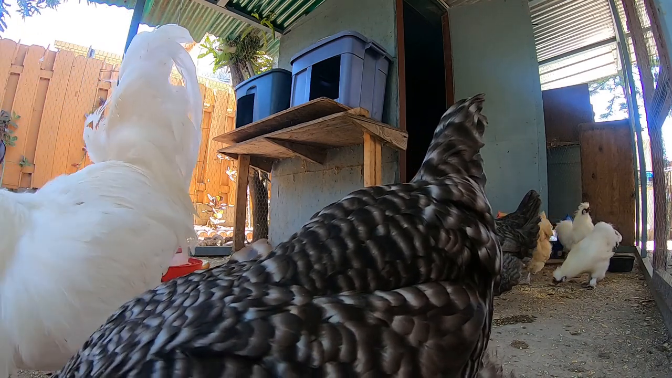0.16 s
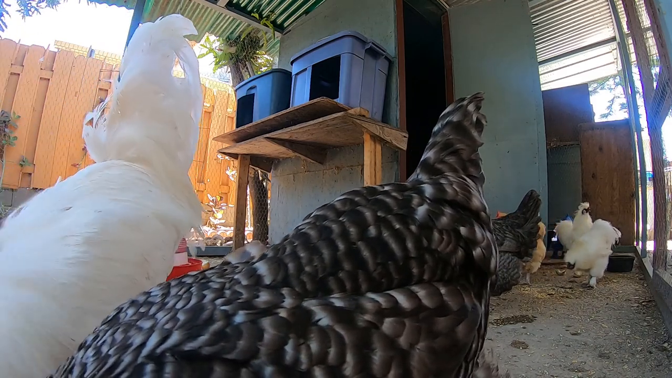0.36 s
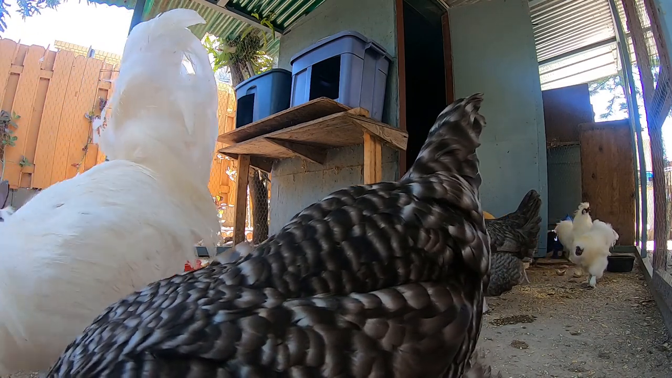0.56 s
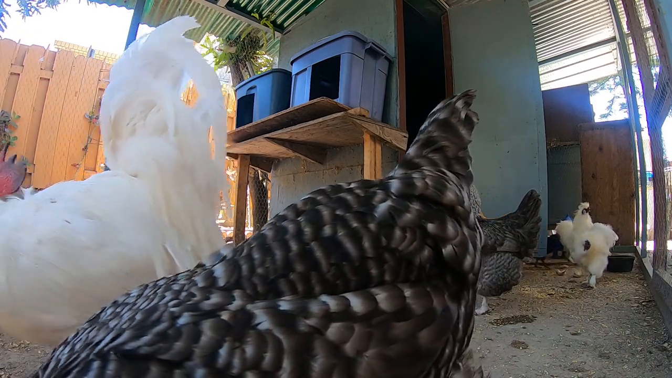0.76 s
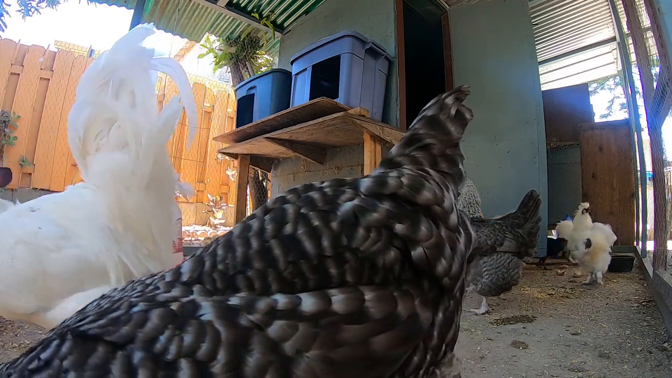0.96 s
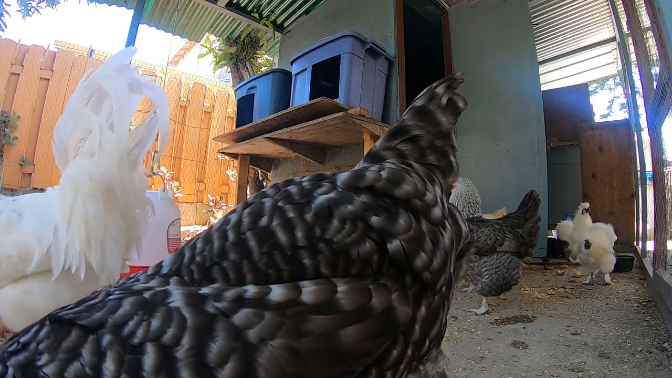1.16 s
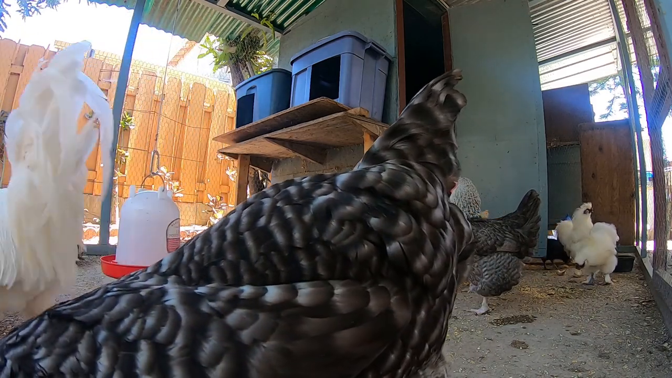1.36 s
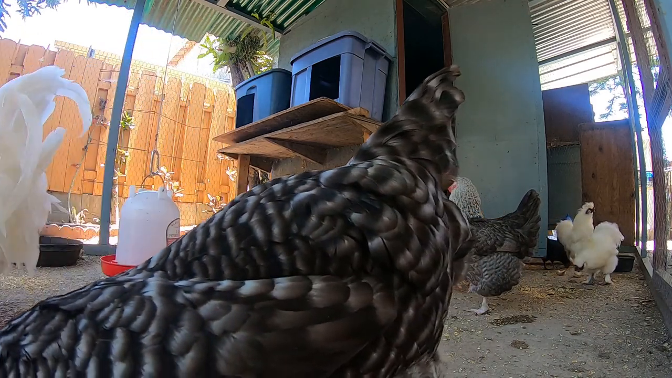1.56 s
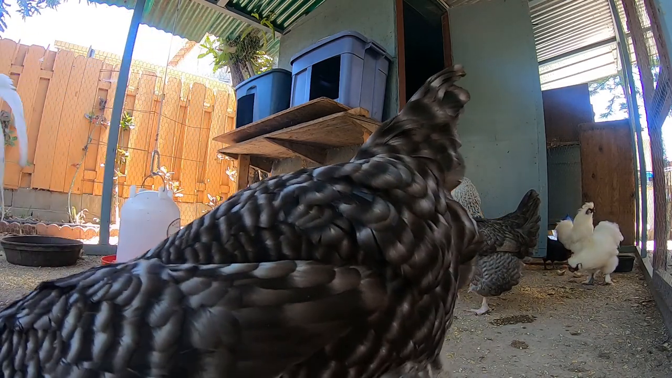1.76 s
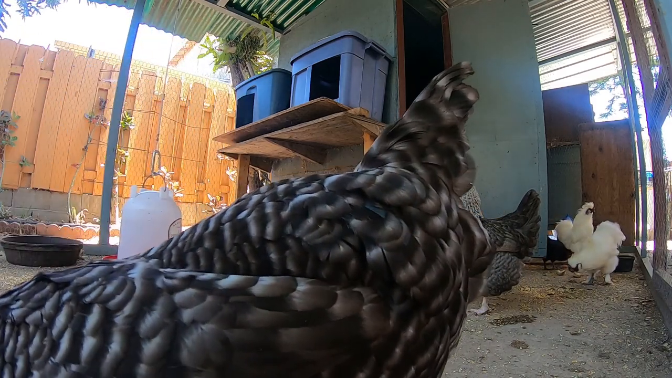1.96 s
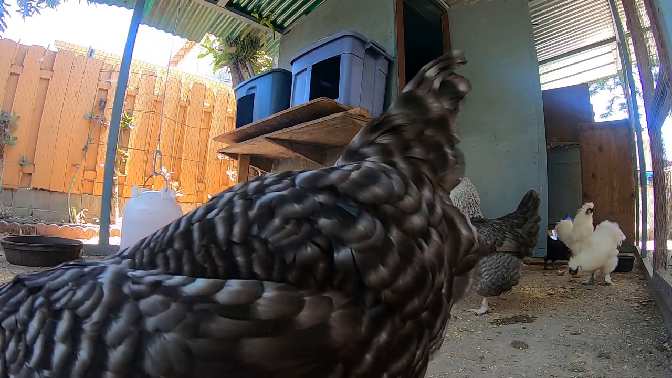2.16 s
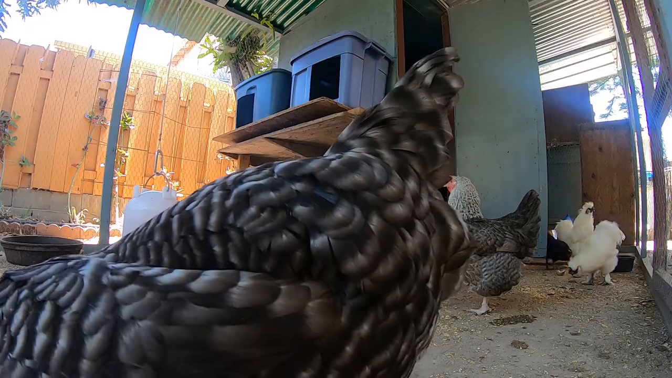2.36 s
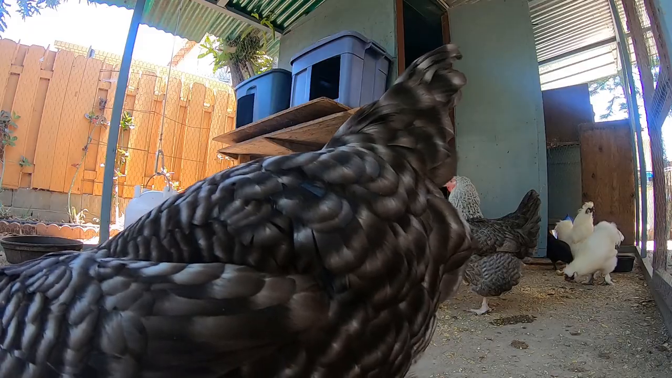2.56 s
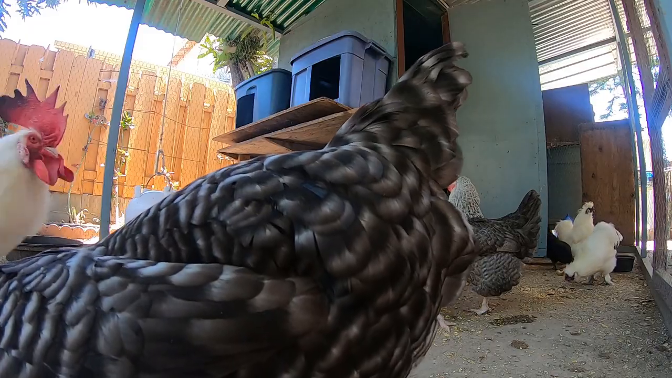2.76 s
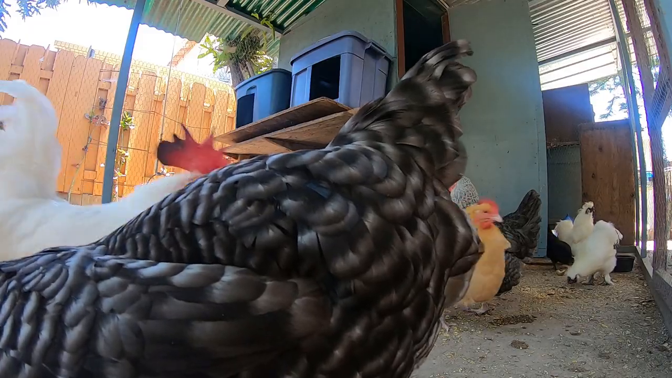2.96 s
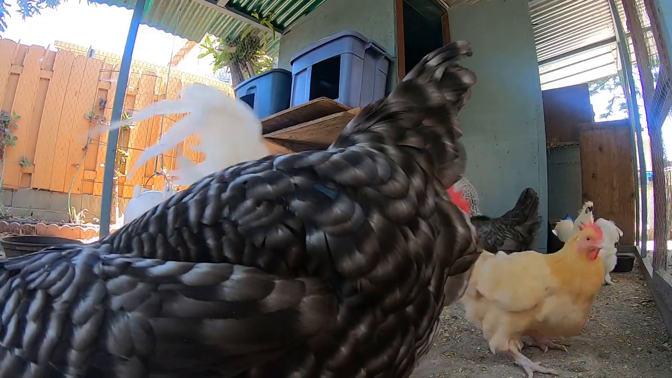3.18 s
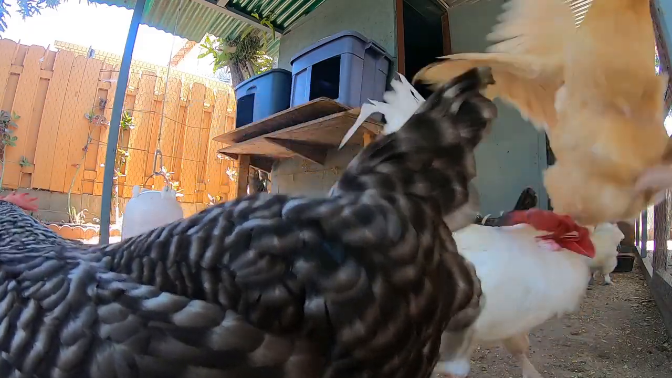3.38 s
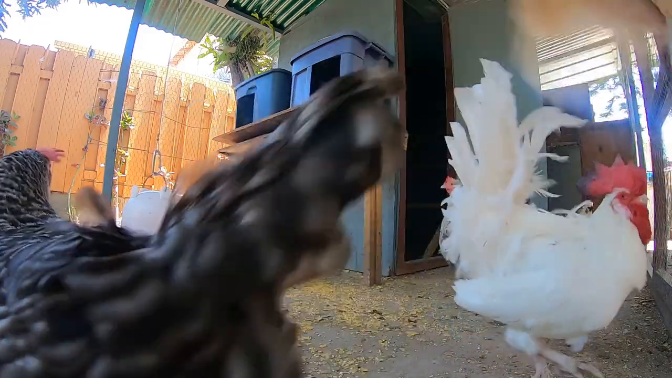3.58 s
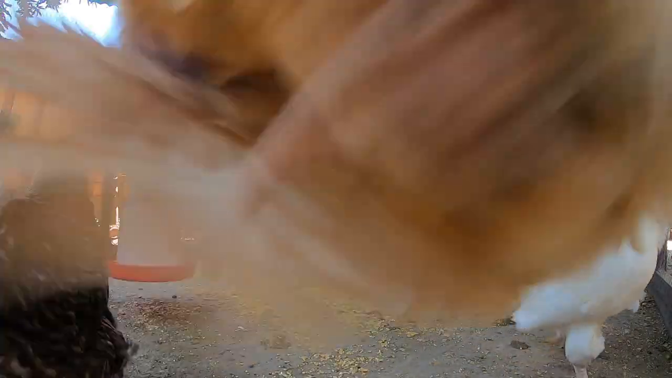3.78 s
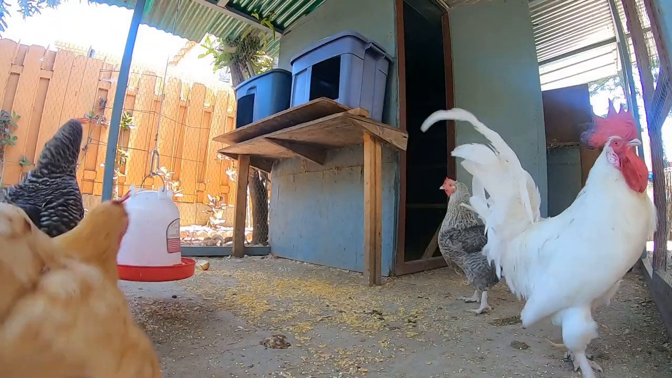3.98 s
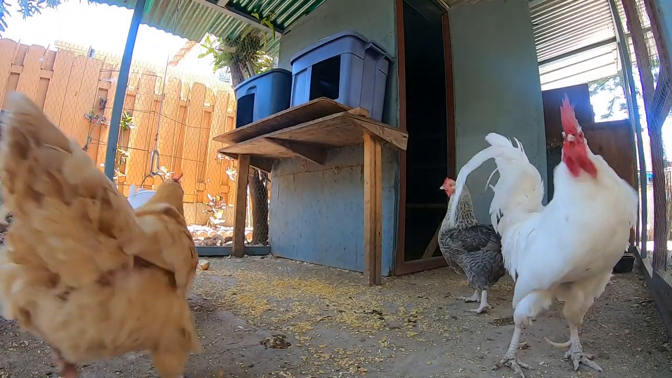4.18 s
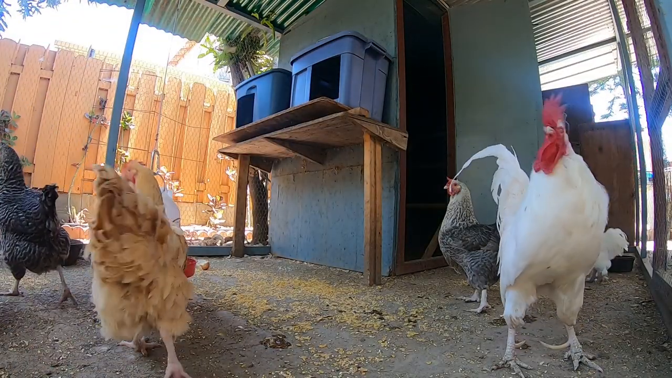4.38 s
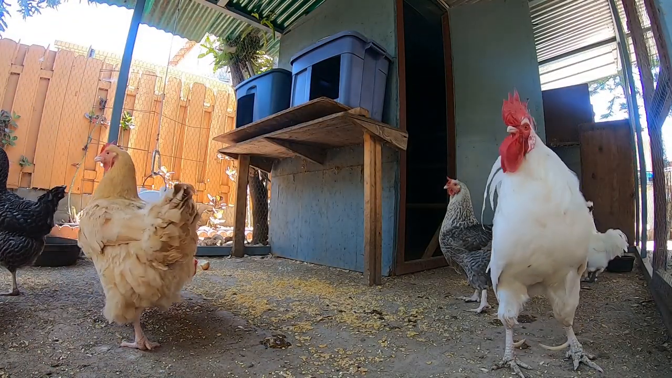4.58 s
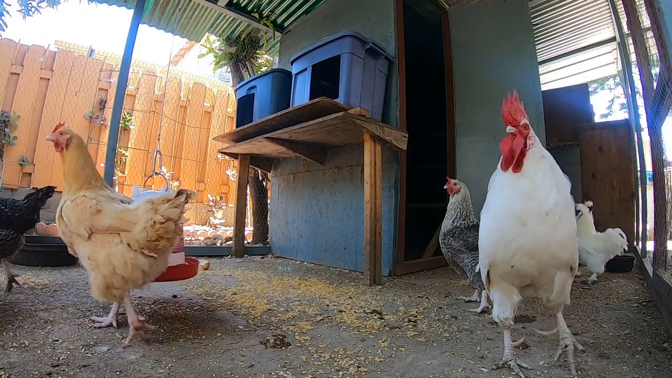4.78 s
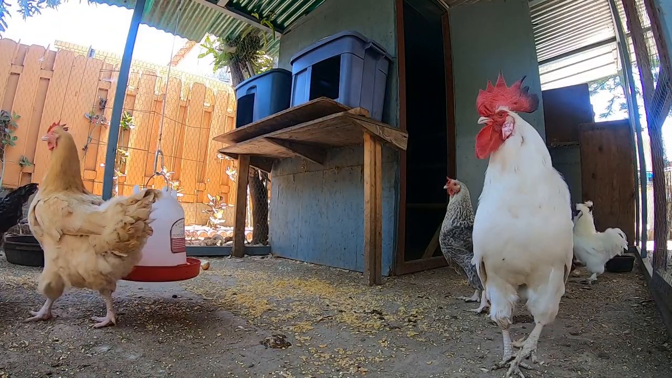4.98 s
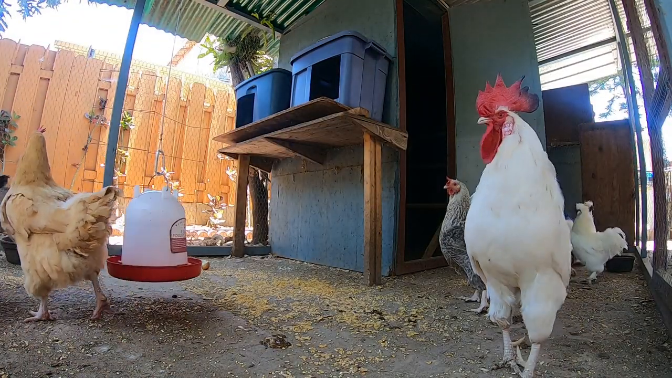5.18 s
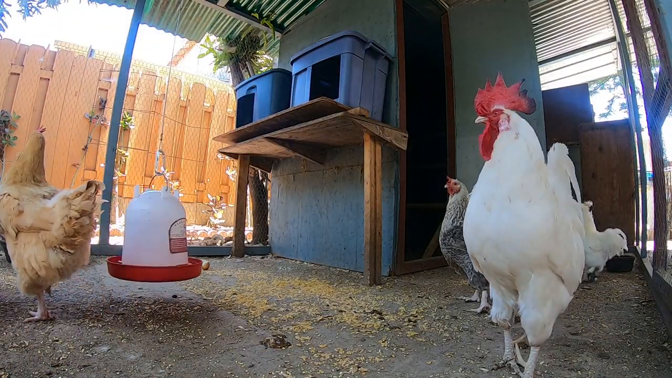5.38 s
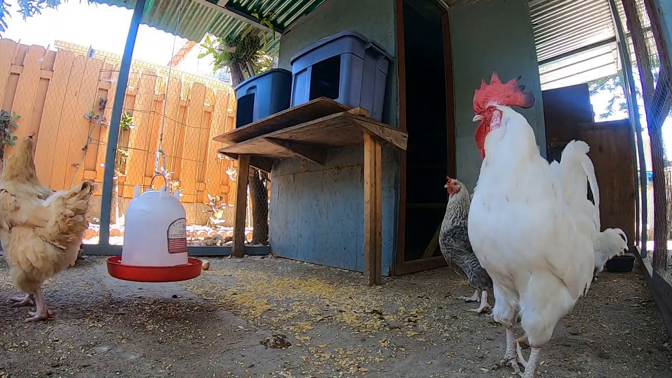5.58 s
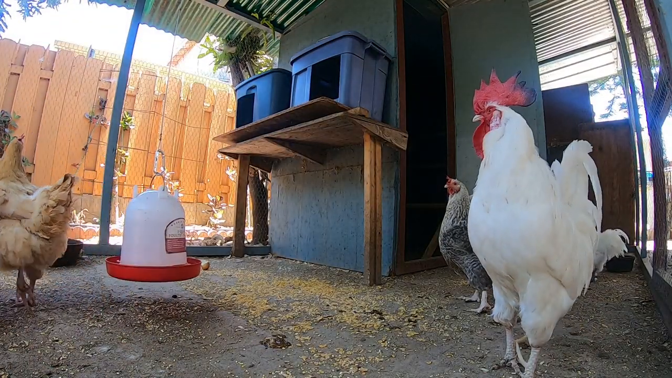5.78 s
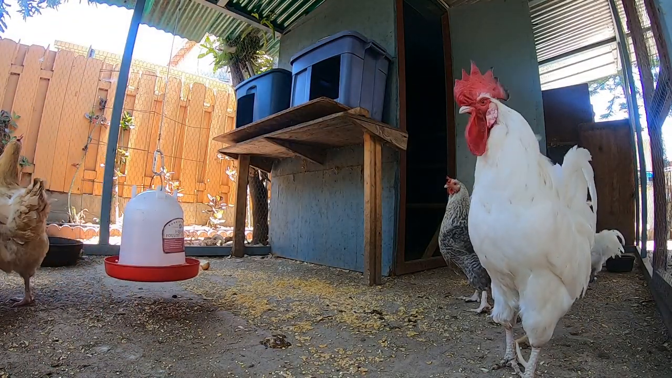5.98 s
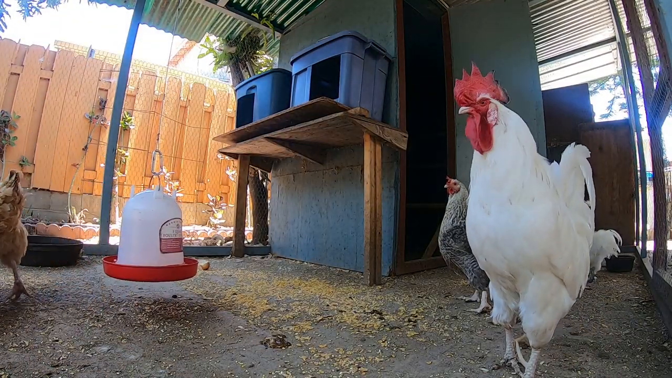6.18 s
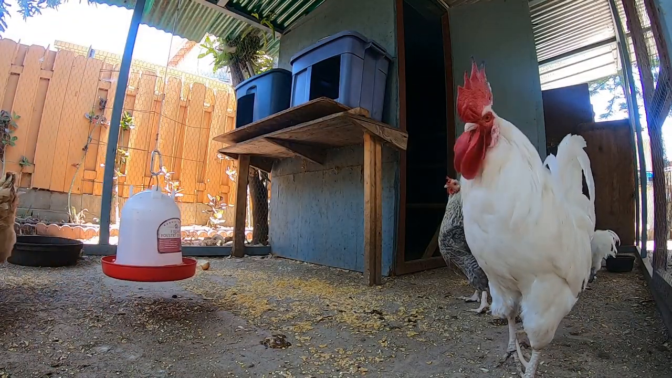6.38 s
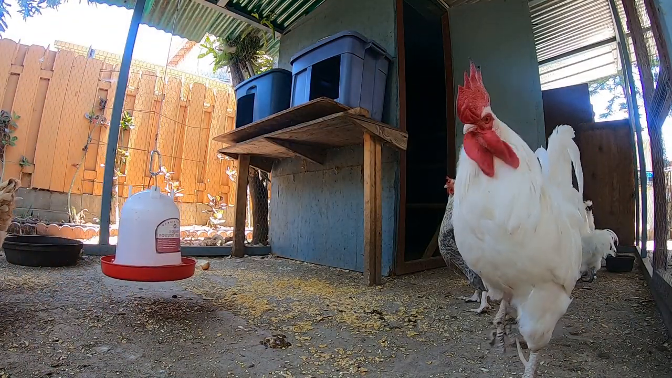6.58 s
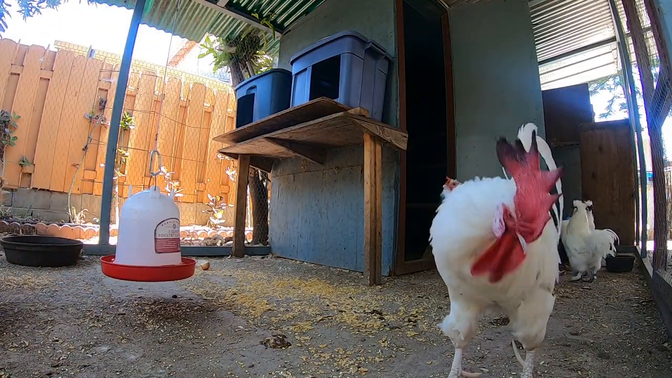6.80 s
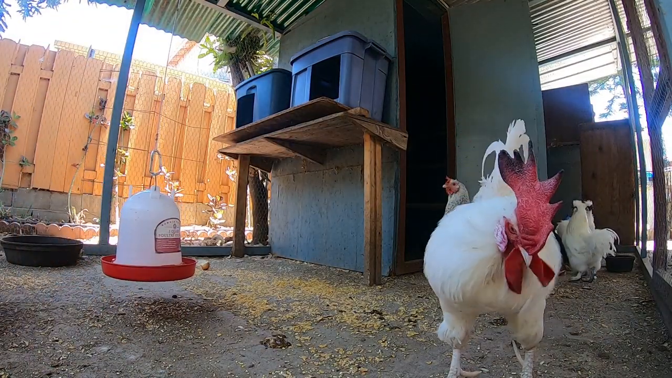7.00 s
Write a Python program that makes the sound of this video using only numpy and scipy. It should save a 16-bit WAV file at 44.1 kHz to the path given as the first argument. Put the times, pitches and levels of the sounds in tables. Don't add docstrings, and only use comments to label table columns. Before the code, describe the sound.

Feet tick and feathers rattle over a low yard rumble, a hen bursts past with squawks and thumping wings, then a long whine and clucks.

```python
import sys
import numpy as np
from scipy import signal
from scipy.fft import rfft, irfft
from scipy.io import wavfile
from scipy.ndimage import uniform_filter1d

SR = 44100
rng = np.random.default_rng(int(sys.argv[2]) if len(sys.argv) > 2 else 0)


def file_out(sig):
    cols = np.atleast_2d(sig).T
    lim = np.clip(cols, -1, 1)
    pcm = np.round(lim * 32767).astype(np.int16)
    wavfile.write(sys.argv[1], SR, pcm)


def gain_from_db(level_db):
    decades = np.asarray(level_db, float) / 20
    return 10 ** decades


N = 310464
T = np.arange(N) / SR
MONO_S = 3.954
OPPOSITE = np.array([[1], [-1]])


def curve(table, t):
    s, *columns = np.transpose(table)
    return [np.interp(t, s, c) for c in columns]


def colour(table, hz):
    f, db = np.transpose(table)
    return gain_from_db(np.interp(np.log(hz + 1), np.log(f), db))


def unit(x):
    return x / np.sqrt(np.mean(x ** 2) + 1e-18)


def shape(x, gain):
    size = x.shape[-1]
    hz = np.arange(size // 2 + 1) * SR / size
    return irfft(rfft(x) * gain(hz), size)


def walk(rate, size=N):
    k = max(int(SR / rate), 1)
    noise = rng.standard_normal(size + 2 * k)
    smooth = uniform_filter1d(uniform_filter1d(noise, k), k)
    return unit(smooth[k:size + k])


def pan(x, db):
    return x * gain_from_db(np.array([[db / 2], [-db / 2]]))


def add(out, x, s):
    i = int(s * SR)
    out[..., i:i + x.shape[-1]] += x[..., :N - i]


def level(spans):
    rows = []
    for span in spans:
        first, last = span[0], span[-1]
        rows += [(first[0] - .02, -90, *first[2:]), *span, (last[0] + .05, -90, *last[2:])]
    return curve(sorted(rows), T)


def yard():
    # (time [s], level [dB])
    yard_swell = [(0, 4.5), (.6, 2), (1.3, 5), (2.0, 0), (2.5, -4), (3.1, -1), (3.5, 8.5), (4.0, -6.5),
                  (5.2, -7), (5.9, 1.5), (6.2, -0.5), (7.04, -2)]
    # (frequency [Hz], level per Hz [dB])
    yard_colour = [(12, -55.5), (20, -25), (65, 1), (130, -7.5), (170, -1.5), (291, -7.5), (412, -19),
                   (446, -17), (804, -20.5), (1700, -26.5), (4700, -40.5), (5600, -48), (8470, -54.5),
                   (12000, -68.5), (15600, -97.5), (22000, -120)]
    # (frequency [Hz], side minus mid [dB])
    yard_side = [(60, -15.5), (200, -19), (380, -13.5), (700, -0.5), (2400, -3.5), (4400, -14.5),
                 (8000, 7.5)]
    # (start [s], deepest [s], recovered [s], depth [dB], share of the yard's swell [0-1])
    ducks = [
        (4.34, 4.6, 5.07, -27.5, 0.65),
        (4.07, 4.25, 5.09, -19, 0.98),
        (3.5, 2.2, 4.7, -14.5, 0.77),
    ]
    levels = []
    for *times, depth_db, share in ducks:
        levels.append(share * curve(yard_swell, T)[0] + np.interp(T, times, [0, depth_db, 0]))

    out, swell = 0, walk(3.8)
    for hz in 25 * 2 ** np.arange(0, 9.1, .5):
        def band(f):
            return colour(yard_colour, f) * np.cos(np.pi * np.log2((f + 1) / hz).clip(-.5, .5))
        mid, side = shape(rng.standard_normal((2, N)), band)
        which = 0 if hz < 115 else 1 if hz < 500 else 2
        flicker_db = (2.4 if hz < 1500 else 1.2) * walk(7.9)
        stereo = mid + colour(yard_side, hz) * side * OPPOSITE
        out = out + gain_from_db(levels[which] + swell + flicker_db) * stereo

    drone_hz, drone_width_hz, drone_db = 161.3, 16.3, -46
    drone = shape(rng.standard_normal(N), lambda f: 1 / (1 + ((f - drone_hz) / drone_width_hz) ** 2))
    return out / np.std(out[:, :SR]) * gain_from_db(-38.5) + unit(drone) * gain_from_db(drone_db + 0.64 * levels[1])


def coop(x):
    t60_s, coop_db = 0.16, -11.5
    t = T[:SR // 2]
    tail = rng.standard_normal((2, len(t))) * np.exp(-np.log(1000) * t / t60_s) * (t > .004)
    tail = shape(tail, lambda f: 1 / (1 + (f / 4000) ** 2))
    tail = tail / np.sqrt(np.sum(tail ** 2) / 2)
    return signal.fftconvolve(x, tail, axes=1)[:, :N] * gain_from_db(coop_db)


def rustle():
    # (peak time [s], peak level [dB], rise [s], fall [s]); rise and fall each span fade_db
    stirs = [(0, -56, .01, 0.32), (1.0, -54.5, 0.045, 0.16), (1.14, -49.5, 0.016, 0.042),
             (1.43, -58.5, 0.3, 0.42), (1.8, -52, 0.097, 0.11), (2.09, -52, 0.025, 0.073),
             (2.72, -58, 0.59, 0.41), (2.862, -38.5, 0.0076, 0.064), (2.885, -35.5, 0.017, 0.14),
             (3.23, -32.5, 0.039, 0.018), (3.33, -40.5, 0.1, 0.053), (3.297, -37, 0.0071, 0.043),
             (3.394, -23, 0.012, 0.066), (3.46, -34, .04, 0.027), (3.52, -36, 0.0089, 0.065),
             (3.59, -38, 0.12, 0.087), (3.66, -33.5, 0.1, 0.063), (3.742, -35, 0.02, 0.018),
             (3.86, -51.5, 0.051, 0.1), (5.075, -68, .05, .05), (5.57, -64.5, .06, 0.096),
             (3.964, -45, 0.021, 0.11)]
    # (frequency [Hz], level per Hz [dB])
    scrape_colour = [(600, -14), (1500, 1), (3000, -2), (5500, -3), (8500, 1.5), (10500, -16), (13000, -36),
                     (15500, -41.5)]
    bed_db, fade_db = -68.5, -13
    bed = bed_db + fade_db * np.clip((T - MONO_S) / .3, 0, .75)
    layers = [bed]
    for s, peak_db, rise, fall in stirs:
        layers.append(peak_db + fade_db * np.maximum((s - T) / rise, (T - s) / fall))
    db = np.max(layers, axis=0)

    grains = rng.standard_normal((2, N)) * gain_from_db(1.1 * walk(86) + 1.8 * walk(500))
    sound = shape(grains, lambda f: colour(scrape_colour, f) * (f > 500))
    down_s, down_length_s, down_db = 2.875, 0.065, -9.5
    low_gain = gain_from_db(down_db * np.exp(-((T - down_s) / down_length_s) ** 2))
    sound -= shape(sound, lambda f: f < 3000) * (1 - low_gain)
    sound += shape(sound, lambda f: f > 10500) * np.clip((db + 55) / 8, 0, 2.5)
    middle = shape(sound, lambda f: (f > 5000) * (f < 10000))
    return sound / np.std(middle) * gain_from_db(db)


def gusts():
    # (time [s], thud level [dB])
    gust_spans = [
        [(1.6, -40), (1.68, -47), (1.7, -29), (1.84, -34), (1.87, -42), (2.0, -57)],
        [(3.2, -62), (3.29, -37.5), (3.62, -29), (3.73, -23), (3.77, -22), (3.87, -27.5), (3.935, -25),
         (4.0, -20.5), (4.07, -38), (4.3, -63)],
    ]
    # (time [s], peak level [dB], frequency [Hz], negative = push before pull)
    strokes = [(3.526, -16, 42), (3.542, -17.5, -37), (1.699, -23.5, -80), (1.713, -24, -57),
               (3.636, -5.5, 45), (3.758, -9, 88), (3.787, -11.5, 93), (3.868, -18, 104),
               (3.957, -12.5, -84), (3.985, -13, 78), (4.017, -15, 70), (3.39, -16, 124), (4.003, -8, -66)]
    thud_db, = level(gust_spans)
    flutter_db = thud_db - 9 + 7.5 * walk(40).clip(-2, 1)
    air = rng.standard_normal((2, 3, N))
    side = np.where(T < 2.5, 2.2, .6) * OPPOSITE
    thud = unit(shape(air[0], lambda f: (f / 30) ** 2 / (1 + (f / 30) ** 2) / (1 + (f / 95) ** 4)))
    flutter = unit(shape(air[1], lambda f: (f > 110) / (1 + (f / 220) ** 2)))
    out = gain_from_db(thud_db + 0.5) * (thud[0] + side * thud[1])
    out += gain_from_db(flutter_db) * (flutter[0] + side * flutter[1])
    for s, db, hz in strokes:
        u = (T - s) * hz * 2 * np.pi
        push_pull = u * np.exp(.5 - u ** 2 / 2) * np.exp(.15 * u.clip(-9, 9))
        balance = 1 + (.22 if s < 3.9 else -.3) * OPPOSITE
        out += gain_from_db(db) * balance * push_pull
    return out


def slaps():
    # (time [s], level [dB], length [s])
    blows = [(1.37, -25, 0.0048), (1.69, -30, 0.014), (1.806, -31.5, 0.031), (3.404, -21, 0.01),
             (3.695, -25, 0.016), (3.755, -8, 0.0063), (3.784, -20, 0.014), (3.404, -28, 0.013),
             (3.886, -33, 0.012), (3.915, -35, 0.0079), (3.957, -24, 0.01), (3.996, -13.5, 0.014)]
    noise = unit(shape(rng.standard_normal((2, N)), lambda f: (f > 150) / (1 + (f / 550) ** 3)))
    noise[1] = 0.93 * noise[1] - 0.58 * noise[0]
    strength = sum(gain_from_db(db) * np.exp(-((T - s) / length) ** 2) for s, db, length in blows)
    return noise * gain_from_db(0.91 * walk(220)) * strength


def specks():
    # (time [s], peak level [dB], ring [Hz], width as share of the ring [0-1])
    flicks = [(1.39, -48, 4000, .5), (1.615, -48, 7000, 0.27), (1.707, -44, 6900, 0.22),
              (1.785, -44, 7500, 0.32), (1.825, -40, 7900, .08), (2.478, -56, 4800, .08),
              (2.492, -54, 9000, .4), (2.613, -47, 7000, .6), (2.707, -50, 5000, .6), (2.79, -47, 6000, .2),
              (2.81, -48, 5100, .12), (2.862, -45, 4500, .2), (3.06, -41, 8600, .12),
              (3.105, -39, 4500, .5), (3.627, -32, 5000, .3), (4.035, -37, 4500, .3),
              (4.78, -59, 9000, 0.044), (4.837, -50, 2900, .12), (5.18, -56, 5300, 0.065),
              (6.113, -40, 1800, .15)]
    out, t = np.zeros((2, N)), T[:SR // 40]
    envelope = np.exp(-t / 0.0028) * (1 - np.exp(-t / .0005))
    for s, db, hz, share in flicks:
        noise = rng.standard_normal((2, len(t)))
        ring = shape(noise, lambda f: 1 / (1 + ((f - hz) / (share * hz)) ** 4))
        add(out, unit(ring) * envelope * gain_from_db(db), s)
    return out


def ticks():
    # (time [s], peak level [dB], grit minus snap [dB])
    foot_steps = [(0.035, -41.5, -1), (1.222, -43, -9), (1.363, -38, -15), (1.3684, -31.5, -28),
                  (1.385, -42, -20), (2.498, -52, 7), (2.6318, -39, -6.5), (2.6782, -48.5, 8),
                  (2.716, -40.5, 3), (2.94, -36, -15), (3.294, -24.5, -9), (3.7432, -27, -5.5),
                  (3.754, -19, -11), (3.7863, -32, -14.5), (3.884, -35, -9.5), (3.8914, -28, -8.5),
                  (3.979, -20, 4), (3.9971, -27.5, -7), (4.2555, -41.5, -10.5), (4.8702, -48, -23),
                  (5.189, -51.5, -6), (5.319, -50, -24), (5.5364, -47, -3), (6.937, -49, -5)]
    # (time [s], peak level [dB], grit minus snap [dB])
    beak_taps = [(0.0892, -32, -13), (0.851, -40.5, -11.5), (1.561, -37.5, -1.5), (3.6478, -16, -0.5),
                 (3.177, -25.5, -3), (3.458, -18.5, 0.5), (3.515, -26, 1), (3.536, -22.5, -4),
                 (3.8624, -18, 1), (4.099, -35.5, -14), (4.139, -39.5, -13), (4.93, -38.5, -22),
                 (4.974, -44, -12), (5.069, -43, -19), (6.157, -61, 7), (6.464, -32, -18),
                 (6.6506, -35.5, -8.5), (6.786, -27.5, -18), (7.03, -37, -8)]
    beak_knock_db, foot_knock_db = -9, 7.5
    hits = [(*r, beak_knock_db) for r in beak_taps] + [(*r, foot_knock_db) for r in foot_steps]
    bands = [(2363, 1.0), (6310, 0.56), (885, 1.0)]
    out, t = np.zeros((2, N)), T[:SR // 8]
    envelope = (np.exp(-t / 0.002) + 0.26 * np.exp(-t / 0.019)) * (1 - np.exp(-t / 0.00072))
    for s, db, grit_db, knock_db in hits:
        sound = 0
        for (centre, width), part_db in zip(bands, (0, grit_db, knock_db)):
            noise = rng.standard_normal((2, len(t)))
            noise[1] = 0.49 * noise[0] + noise[1]
            part = shape(noise, lambda f: 1 / (1 + (np.log2((f + 1) / centre) / width) ** 6))
            sound = sound + gain_from_db(part_db) * unit(part)
        add(out, sound * envelope * gain_from_db(db - 3.0), s)
    return out


def peck():
    # (frequency [Hz], level [dB], time to fall 60 dB [s])
    modes = [(800, -8, .01), (1650, 0.1, .014), (2000, -4, .008), (2700, -5, .008), (3200, 0.1, .012),
             (3800, -8, .006), (4900, -10, .006), (6280, -10, .006), (8000, -12, .006)]
    t, out = T[:SR // 4], np.zeros(N)
    ring = 0
    for hz, db, t60 in modes:
        ring = ring + gain_from_db(db) * np.exp(-np.log(1000) * t / t60) * np.sin(2 * np.pi * hz * t)
    bounces = rng.random(len(t)) < .03
    rattle = bounces * rng.standard_normal(len(t)) * 0.2 * np.exp(-t / 0.031)
    rattle[0] = 1
    sound = signal.fftconvolve(rattle, ring / np.abs(ring).max())[:len(t)]
    add(out, sound * gain_from_db(-9.5), 2.073)
    return out


def quills():
    # (time [s], peak level [dB])
    knocks = [(1.6626, -32), (1.675, -32), (1.6893, -28), (1.705, -26), (1.737, -27), (1.751, -31),
              (1.7644, -29), (1.773, -28), (1.785, -19.5), (1.7965, -26), (1.8088, -20.5), (1.819, -31),
              (1.831, -40)]
    # (frequency [Hz], width [Hz], level [dB])
    body_modes = [(1310, 86, 10.5), (1680, 140, 2), (2630, 260, -3.5), (4840, 410, -12)]

    def body_gain(f):
        return sum(gain_from_db(g) / (1 + ((f - c) / w) ** 2) for c, w, g in body_modes)

    out, t = np.zeros((2, N)), T[:SR // 20]
    envelope = np.exp(-t / 0.0054) * (1 - np.exp(-t / 0.00044))
    for s, db in knocks:
        body = shape(rng.standard_normal((2, len(t))), body_gain)
        add(out, unit(body) * envelope * gain_from_db(db - 2.5), s)
    return out


def chirps():
    # (start [s], end [s], start pitch [Hz], end pitch [Hz], level [dB])
    small_calls = [(1.912, 2.04, 1800, 3240, -48), (1.945, 2.04, 2600, 2450, -50.5),
                   (3.884, 3.897, 586, 400, -23), (3.906, 3.924, 450, 542, -29),
                   (3.893, 3.913, 1330, 1230, -37.5), (2.201, 2.264, 3550, 2330, -51.5),
                   (0.103, 0.16, 3600, 2310, -57), (2.519, 2.595, 463, 420, -49.5),
                   (3.02, 3.12, 10000, 7200, -57.5), (6.473, 6.592, 7100, 6940, -68.5)]
    fall_share = 0.31
    out = np.zeros(N)
    for s0, s1, start_hz, end_hz, db in small_calls:
        early_hz = end_hz if end_hz > start_hz else start_hz + fall_share * (end_hz - start_hz)
        u = np.linspace(0, 1, int((s1 - s0) * SR))
        hz = np.interp(u, [0, .25, 1], [start_hz, early_hz, end_hz]) * (1 + .023 * walk(700, size=len(u)))
        loudness = gain_from_db(db + 2.3 * walk(180, size=len(u))) * np.sin(np.pi * u) ** 0.51
        add(out, loudness * np.sin(2 * np.pi * np.cumsum(hz) / SR), s0)
    return out


def framed(hold, attack_s, release_s, swoop=1.):
    attack_db, release_db = -14.5, -25.5
    (s0, hz0, db0, *more0), (s1, hz1, db1, *more1) = hold[0], hold[-1]
    rise = (s0 - attack_s, hz0 * swoop, db0 + attack_db, *more0)
    fade = (s1 + release_s, hz1, db1 + release_db, *more1)
    return [rise, *hold, fade]


def chaos(t):
    # (start [s], end [s], roughness [0-1])
    breaks = [(3.245, 3.29, .28), (3.235, 3.24, .12), (3.31, 3.345, .22), (3.35, 3.4, .4),
              (3.582, 3.59, .16), (3.458, 3.461, .5), (3.592, 3.61, .33), (4.2, 4.28, .06),
              (4.36, 4.46, .06), (4.47, 4.64, .2), (4.66, 4.765, .33), (4.805, 4.87, .45),
              (5.47, 5.53, .26), (5.54, 5.6, .09), (5.63, 5.7, .9), (5.71, 5.765, .33), (5.78, 6.04, .055),
              (5.87, 5.915, .3), (6.055, 6.25, .45), (6.404, 6.41, .24), (6.42, 6.46, .15)]
    calm, ramp_s = .035, .014
    layers = []
    for s0, s1, rough in breaks:
        inside = np.clip(1 + np.minimum(t - s0, s1 - t) / ramp_s, 0, 1)
        layers.append(np.maximum(calm, rough * inside))
    return np.max(layers, axis=0)


def voice(call, gain_of, top_hz, chaos_hz, jitter, half_top_hz=0, wild=1., patchy_db=2., lag=.35, haze=1.15):
    t = T[int(call[0][0] * SR):int(call[-1][0] * SR)]
    size = len(t)
    hz, db, *extra = curve(call, t)
    steady = 1 - np.clip(chaos(t) * wild, 0, .99)
    shaken_hz = hz * (1 + jitter * (1.1 - steady) * walk(chaos_hz, size=size))
    phase = 2 * np.pi * np.cumsum(shaken_hz) / SR
    shimmer = walk(chaos_hz, size=size)
    out, power = 0, 0
    step = .5 if half_top_hz else 1
    for k in np.arange(step, top_hz / hz.mean(), step):
        line_hz = k * hz.mean()
        if k % 1 and line_hz > half_top_hz:
            continue
        gain = gain_of(k, hz, extra, t, steady)
        if line_hz > 2000:
            shimmer = walk(chaos_hz * 2, size=size)
        clean = (.995 * steady) ** ((k * hz / 900) ** haze)
        smear = shimmer + 1j * walk(chaos_hz * (1 + (line_hz / 1500) ** 2), size=size)
        patchy = gain_from_db(patchy_db * walk(23, size=size))
        swing = np.sqrt(clean) + np.sqrt((1 - clean) / 2) * smear
        turning = np.exp(1j * (k * phase - lag * k ** 2))
        out = out + gain * patchy * np.real(swing * turning)
        power = power + gain ** 2 / 2
    edge = np.clip(np.minimum(t - t[0], t[-1] - t) / 0.00099, 0, 1)
    return out / np.sqrt(power) * gain_from_db(db) * edge


def growl():
    # (time [s], pitch [Hz], level [dB])
    growl_path = [
        (4.465, 550, -46),
        (4.48, 537.2, -40.5),
        (4.568, 510, -34),
        (4.7, 510, -35),
        (4.771, 532, -35),
        (4.79, 460, -32),
        (4.825, 454, -31),
        (4.838, 327, -36),
        (4.855, 210, -45),
    ]
    # (frequency [Hz], level [dB])
    throat = [(200, 6), (520, 3), (1000, -14.5), (1500, -27), (2500, -34.5)]

    def gain(k, hz, extra, t, steady):
        return colour(throat, k * hz)

    out = np.zeros(N)
    sound = voice(growl_path, gain, 2400, 150, .04, wild=1.8, patchy_db=1.)
    throb = 1 + 0.52 * np.sin(2 * np.pi * 91.05 * T[:len(sound)])
    add(out, sound * throb, growl_path[0][0])
    return out


def whine():
    # (time [s], pitch [Hz], level [dB], half-pitch lines [dB])
    whine_path = [
        (4.215, 982, -36.5, -40),
        (4.259, 921, -29.5, -60),
        (4.295, 872, -29.5, -12.5),
        (4.39, 847, -29, -5.5),
        (4.47, 868, -26.5, -13.5),
        (4.63, 867.3, -28.5, -10),
        (4.759, 777, -34, -21),
        (4.786, 879, -29, -12),
        (4.825, 697, -34.5, -25),
    ]
    # (frequency [Hz], level [dB])
    throat = [(300, -7), (450, 0), (870, 4), (1300, -34.5), (1750, -26), (2170, -32.5), (2600, -33.5),
              (3000, -34.5), (3500, -32), (3900, -36.5), (4800, -38.5), (6000, -68.5)]
    opens_s, shut_db = 4.29, -0.5

    def gain(k, hz, extra, t, steady):
        shut = np.clip((opens_s - t) / 0.032, 0, 1)
        total = colour(throat, k * hz) * gain_from_db(shut_db * np.log2(max(k, 1)) * shut)
        if k % 1:
            total = total * gain_from_db(extra[0] + (k > 1) * 13.2)
        return total

    out = np.zeros(N)
    call = framed(whine_path, .016, .022, swoop=1.055)
    add(out, voice(call, gain, 5500, 200, .004, half_top_hz=np.inf, patchy_db=.8, haze=1.75), call[0][0])
    return out


def clucks():
    # (time [s], pitch [Hz], level [dB], crop resonance lift [dB], beak resonance lift [dB])
    cluck_paths = [
        [(5.36, 242.3, -41.5, 19, 1), (5.425, 246, -44, 15, 4), (5.46, 289.7, -37, 13, -6),
         (5.54, 294.9, -32.5, 5.5, -0.5), (5.61, 301, -29.5, 7.5, -0.5), (5.66, 304.8, -32, 5.5, 4.5),
         (5.73, 312.6, -29.5, 3, 2.5), (5.8, 316, -29, -6, 1.5), (5.87, 333.4, -26, 1.5, 7),
         (5.92, 349, -26.5, 3, -6), (5.97, 361.7, -24.5, -2.5, -1), (6.0, 370.6, -24.5, 2, 9),
         (6.035, 388.7, -18.5, -1, 5), (6.055, 396.2, -26, 1, 0.5)],
        [(6.256, 307, -25, -6, 2.4), (6.275, 320, -27.5, 7.5, 0.1), (6.315, 336, -29, 1.5, 1),
         (6.345, 337.3, -27, -16, 1.8), (6.375, 346, -26, 11, 2), (6.41, 363, -25.5, 5.5, 2),
         (6.422, 366.6, -30, 7, 0.1), (6.443, 363, -37, 0, 0.1)],
    ]
    # (frequency [Hz], level [dB])
    long_throat = [(250, 1.5), (360, 3), (600, -5), (780, -1.5), (950, -9), (1150, 3.5), (1300, 6),
                   (1550, -4), (2000, -23.5), (3100, -17.5), (4700, -45), (5700, -54.5), (7800, -58),
                   (10000, -61)]
    # (frequency [Hz], level [dB])
    short_throat = [(300, 1), (700, 0.5), (1000, -15), (1300, 6.5), (1750, -5.5), (2150, -32), (2700, -9.5),
                    (3600, -29), (4600, -33.5), (5700, -46), (10000, -57)]
    # (frequency [Hz], width [Hz], lift [dB])
    head = [(3700, 270, 6.5), (5640, 320, 12), (6700, 440, -11.5), (7800, 450, 11)]
    effort_hz, effort_tilt_db = 329, 15
    neck_share = .65
    out = np.zeros(N)
    for hold, throat, release_s in zip(cluck_paths, (long_throat, short_throat), (.065, .031)):
        def gain(k, hz, extra, t, steady):
            crop_db, beak_db = extra
            total = colour(throat, k * hz * np.maximum(effort_hz / hz, 1) ** neck_share)
            total = total * gain_from_db(effort_tilt_db * np.log2(hz / effort_hz).clip(-.2, .3) * np.log2(k))
            for centre, width, lift_db in [(630, 170, crop_db), (1240, 160, beak_db), *head]:
                total = total * gain_from_db(lift_db * np.exp(-((k * hz - centre) / width) ** 2))
            if k % 1:
                total = total * gain_from_db(-9 - 18 * (k < 1)) * np.clip(4 * (1 - steady) - .5, 0, 1)
            return total

        call = framed(hold, .012, release_s, swoop=0.99)
        add(out, voice(call, gain, 10000, 274, 0.016, half_top_hz=1700, haze=1.34), call[0][0])
    return out


def squawks():
    # (time [s], hold [s], start pitch [Hz], end pitch [Hz], level [dB])
    squawk_groups = [
        ((740, 22, .45, 0.006), [(3.418, 0.012, 715, 705, -16), (3.562, 0.005, 830, 790, -28), (3.569, .006, 760, 690, -21)]),
        ((1300, 9, .5, .007), [(3.237, 0.0075, 640, 590, -18.5), (3.252, .024, 640, 620, -30), (3.577, 0.01, 590, 575, -14), (3.589, .012, 585, 660, -14.5)]),
        ((1380, 12, .3, .008), [(3.453, 0.014, 720, 750, -15), (3.472, .014, 733, 590, -13.5)]),
        ((1200, 20, .4, 0.0056), [(3.168, 0.022, 995, 1453, -33), (3.224, .004, 1450, 1180, -22)]),
        ((1800, 9, .2, 0.006), [(3.314, 0.016, 460, 445, -17)]),
        ((900, 5, .3, 0.012), [(3.333, 0.015, 460, 420, -17)]),
        ((2130, 16, .25, 0.005), [(3.435, 0.016, 605, 595, -13.5)]),
    ]
    # (frequency [Hz], level [dB])
    throat = [(180, -38), (300, 3), (687, 0.5), (1180, 5.5), (1910, 1), (2440, 0), (3720, -2),
              (4800, -21.5), (7430, -10), (11000, -52.5), (14300, -92), (22000, -120)]
    out = np.zeros((2, N))
    for (beak_hz, lift_db, share, release_s), notes in squawk_groups:
        def gain(k, hz, extra, t, steady):
            near_beak = np.exp(-((k * hz - beak_hz) / (share * beak_hz)) ** 2)
            return colour(throat, k * hz) * gain_from_db(lift_db * near_beak)

        for s, hold_s, hz0, hz1, db in notes:
            hold = [(s, hz0, db), (s + hold_s, hz1, db - 0.5)]
            call = framed(hold, .005, release_s, swoop=1.04)
            sound = voice(call, gain, 10000, 550, 0.009, lag=.1, patchy_db=-0.24)
            add(out, pan(sound, -5.0), call[0][0])
    return out


def scene():
    # (time [s], depth [dB], recovery [s])
    limits = [
        (3.759, -12.5, 0.047),
        (3.868, -4.5, 0.026),
        (3.984, -2, 0.048),
    ]
    voices = squawks() + whine() + growl() + clucks() + chirps()
    near = shape(voices + peck() + quills(), lambda f: 1 / (1 + (f / 10500) ** 8))
    limit_db = 0
    for s, db, back_s in limits:
        onset = np.clip((T - s) / 0.0016, 0, 1)
        limit_db = limit_db + db * onset * np.exp(-((T - s).clip(0) / back_s) ** 2)
    treble = gain_from_db(limit_db) * (ticks() + rustle())
    return near + coop(near) + treble + gusts() + slaps() + yard() + specks()


def low_pass(x):
    return signal.sosfilt(signal.butter(12, 15600, fs=SR, output="sos"), x)


def record(dry):
    mid, side = (dry[0] + dry[1]) / 2, (dry[0] - dry[1]) / 2
    fade_db_per_s = -49
    side = side * gain_from_db(np.clip(fade_db_per_s * (T - MONO_S), -55, 0))
    return low_pass(np.clip([mid + side, mid - side], -1, 1))


dry = scene()
out = record(dry)
file_out(out)
```